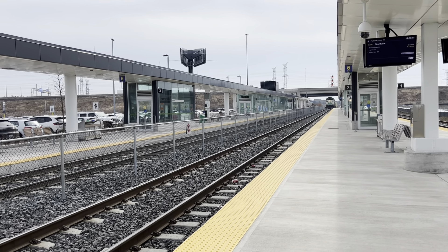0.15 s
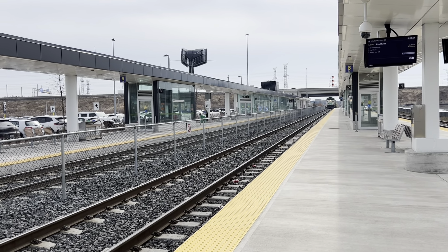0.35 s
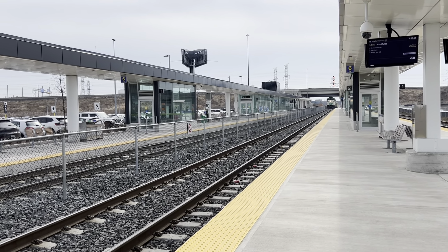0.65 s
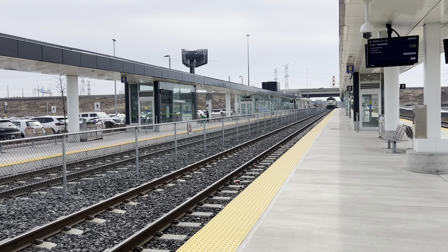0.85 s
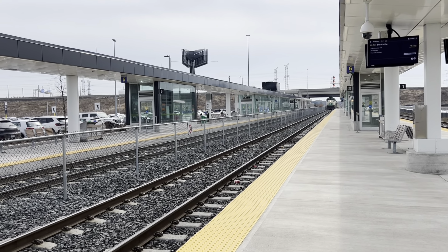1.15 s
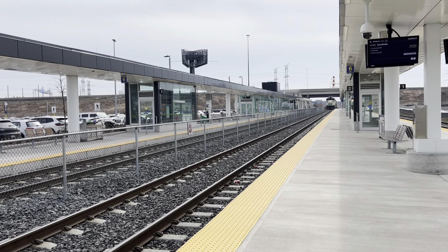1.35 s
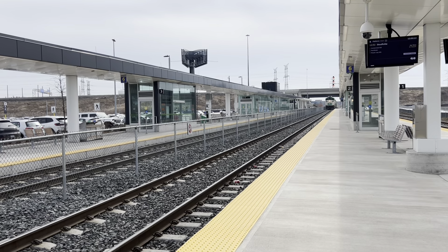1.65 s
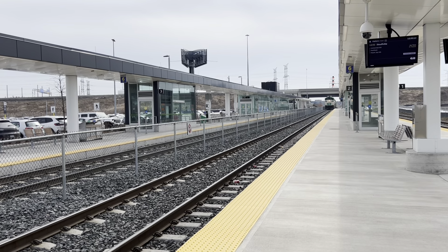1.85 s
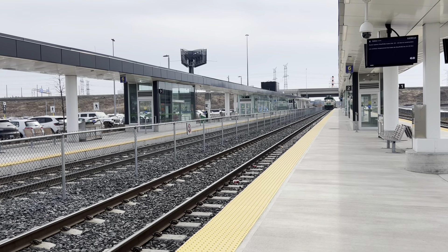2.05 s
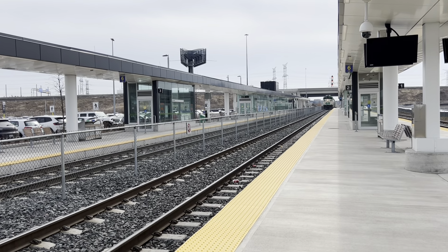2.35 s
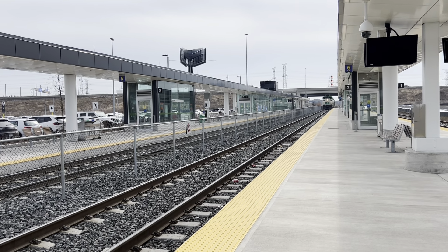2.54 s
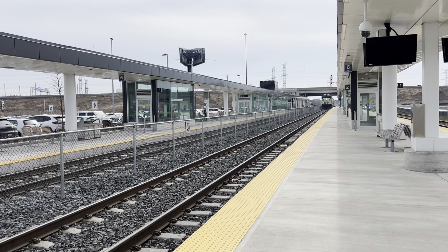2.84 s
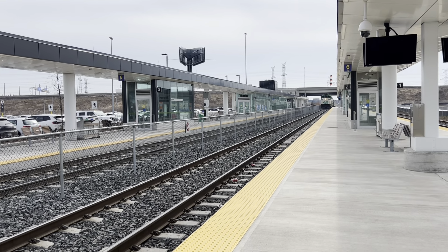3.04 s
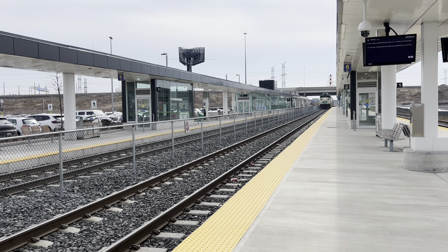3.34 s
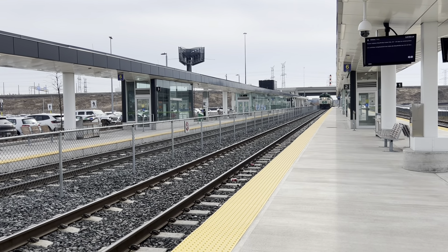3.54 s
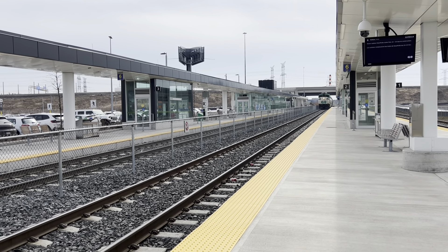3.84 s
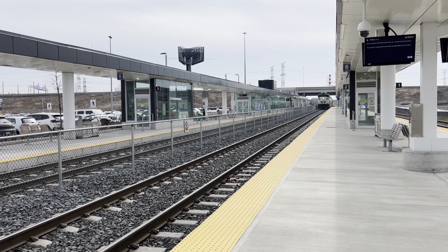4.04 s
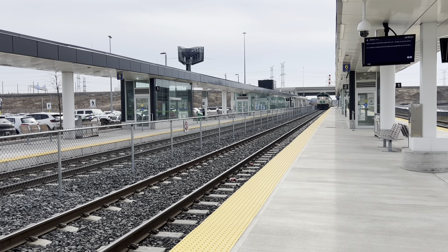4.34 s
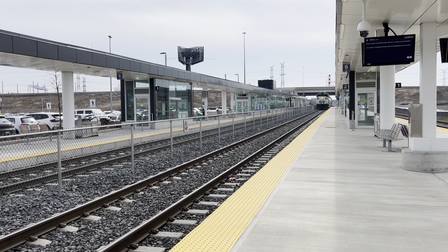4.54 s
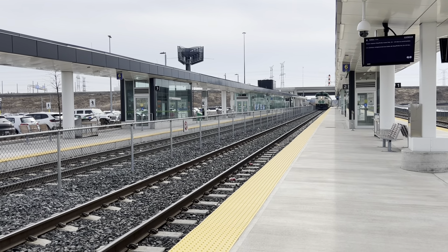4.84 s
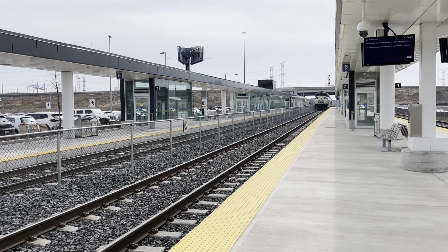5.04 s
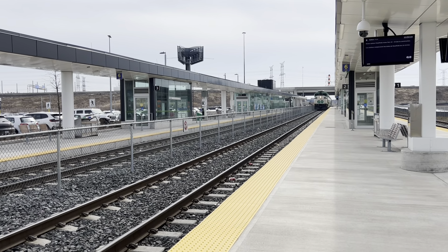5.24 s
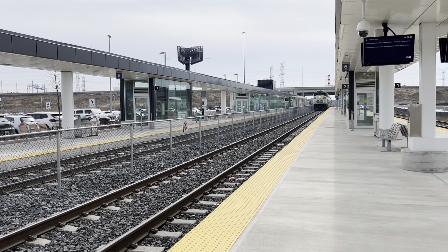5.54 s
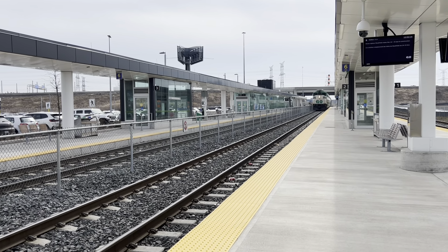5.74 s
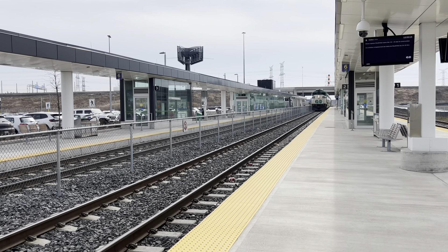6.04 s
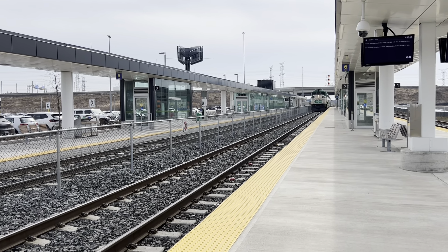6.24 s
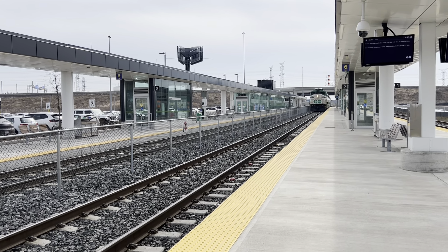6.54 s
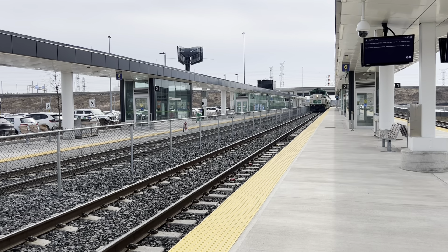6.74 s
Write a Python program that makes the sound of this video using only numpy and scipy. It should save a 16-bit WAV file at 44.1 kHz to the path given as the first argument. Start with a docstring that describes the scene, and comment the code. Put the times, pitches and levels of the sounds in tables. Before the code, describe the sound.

A steady train bell dominates, each stroke a hard metallic clang with a high, beating ring that swells again and overlaps the next. It starts distant and gets clearly louder halfway, with short reflections from roof and pillars. Low engine rumble, a humming fan and soft wheel noise rise slowly underneath, over a thin constant hiss. Heard in stereo from the platform, bell slightly left; the train never passes.

```python
"""A locomotive bell rings every two thirds of a second as a diesel train slows towards a roofed platform.
Each blow adds a clang, a crowd of overtones and a strong strike note that beats, swells again and lingers.
The bell is built from sine partials whose pitch sinks as the train brakes (Doppler shift).
Under it, shaped noise makes the exhaust throb, engine roar, wheels and hiss, all but a steady thin hiss
changing over time; wavering tones make the fan drone, and one faint ring sounds early on."""
import sys
import numpy as np
from scipy import signal
from scipy.fft import rfft, irfft, next_fast_len
from scipy.io import wavfile
from scipy.ndimage import uniform_filter1d

SR = 44100
rng = np.random.default_rng(int(sys.argv[2]) if len(sys.argv) > 2 else 0)


def unload_audio(sound):
    """Save the sound as a 16-bit wav file, at the path given as the first command line argument."""
    columns = np.transpose(np.atleast_2d(sound))
    # keep every value between -1 and 1, then stretch to whole-number steps
    steps = np.round(np.clip(columns, -1, 1) * 32767)
    wavfile.write(sys.argv[1], SR, steps.astype(np.int16))


N = 303849
TIME = np.arange(N) / SR  # seconds
EARS = np.array([[1], [-1]])  # left and right, with opposite signs

# One row for each blow of the clapper, the first already ringing out:
# (time [s], clang and lower partials [dB], 1.6 kHz partial [dB], treble partials [dB],
#  strike note's peak [dB], its second swell [dB], delay to the top of that swell [s],
#  its lingering ring [dB], bright partial [dB], bright partial's fade [dB/s])
BLOWS = [ (-0.364, -2.5, -16.5, -4.5, -34, -44.5, 0.09, -54.5, -51.5, 63),
         (0.296, -13.5, -16.5, -10.5, -32, -34, 0.25, -45, -72, 22),
         (0.957, -10, -11.5, -8, -27, -36.5, 0.22, -45.5, -57.5, 53),
         (1.617, -7, -9, 4, -20.5, -27, 0.3, -45.5, -56.5, 26),
         (2.273, 0, -3, -1, -31.5, -30, 0.32, -35, -44.5, 81),
         (2.937, -1, -9.5, -3, -13.5, -22, 0.27, -32.5, -53, 44.5),
         (3.6, 2, -2.5, 1, -14, -27, 0.28, -36, -54.5, 31.5),
         (4.264, 2, 2, 0, -16, -19.5, 0.26, -33.5, -50.5, 31.5),
         (4.929, 3.5, 2.5, 2, -15.5, -23, 0.27, -32, -48, 36),
         (5.593, 3.5, 1.5, -1.5, -14, -26.5, 0.33, -33, -51, 53.5),
         (6.260, 2.5, -1, 1.5, -17.5, -22.5, 0.29, -54.5, -53, 30), ]

# How near the train is: (time [s], nearness [0 far, 1 close])
NEARNESS = [(0, 0), (1.7, 0.22), (3.1, .2), (4.2, .6), (6.89, 0.95)]

NOTE_HZ = 1803  # reference pitch of the strike note, about the middle of its slow downward slide


def amp(db):
    """Turns decibels into a gain."""
    return 10 ** (np.asarray(db) / 20)


def unit(x):
    """Scales a signal to rms 1."""
    return x / np.sqrt(np.mean(abs(x) ** 2) + 1e-20)


def curve(rows, axis=1):
    """Reads one column of a time table at every sample."""
    rows = np.asarray(rows)
    return np.interp(TIME, rows[:, 0], rows[:, axis])


def at_hz(points, hz):
    """Reads a table of frequencies and values on a log-frequency axis."""
    f, value = np.transpose(points)
    return np.interp(np.log(hz + 1), np.log(f), value)


def rise(t, length_s):
    """A smooth start from 0 to 1."""
    return np.sin(np.pi / 2 * np.clip(t / length_s, 0, 1)) ** 2


def noise(spectrum):
    """Noise of rms 1 with the given spectrum."""
    size = next_fast_len(N, True)
    white = rfft(rng.standard_normal(size))
    shape = amp(at_hz(spectrum, np.fft.rfftfreq(size, 1 / SR)))
    return unit(irfft(white * shape, size)[:N])


def drift(rate_hz):
    """Smooth random movement of rms 1, mostly slower than the rate."""
    size = 4096
    hz = np.fft.rfftfreq(size, TIME[-1] / size)
    slow = irfft(rfft(rng.standard_normal(size)) / (1 + (hz / rate_hz) ** 4))
    return np.interp(TIME, np.linspace(0, TIME[-1], size), unit(slow))


def place(x, pan_db):
    """Places a sound in stereo; pan_db is the left level minus the right."""
    return x * amp(EARS * pan_db / 2)


def spread(spectrum, side_db, pan_db):
    """Wide noise: a part common to both ears plus a weaker part of opposite sign in each."""
    common = noise(spectrum)
    opposed = amp(side_db) * noise(spectrum)
    return place(common + EARS * opposed, pan_db)


def partial(phase, gain, flutter, rate_hz):
    """A tone with a share of scattered sound that makes it flutter."""
    scatter = 1 + flutter * (drift(rate_hz) + 1j * drift(rate_hz))
    smooth_gain = uniform_filter1d(gain, size=96)
    return np.sqrt(2) * smooth_gain * (scatter * np.exp(1j * phase)).real


def beating(t, beat_hz, twin, dip_s):
    """Loudness of a split mode: its twin weakens it most at dip_s and once in every beat."""
    return abs(1 - twin * np.exp(2j * np.pi * beat_hz * (t - dip_s)))


def bell_clock():
    """Bell time [s] whose rate sinks steadily, sliding pitches from slightly sharp to slightly flat."""
    start_hz, sag_hz_per_s = 1813.1, 2.28  # the strike note as heard at first, and how fast it sinks
    return np.cumsum(start_hz - sag_hz_per_s * TIME) / NOTE_HZ / SR


def station(x, early_s, early_db):
    """Dense early reflections from roof, pillars and track, then a tail that dies by band."""
    # How long the station rings: (frequency [Hz], time to fall by 60 dB [s])
    ring_times = [(300, 1.4), (1600, 0.43), (3000, 1.5), (6000, 0.07)]
    t = np.arange(SR) / SR
    # about 3000 random reflections a second, partly different at each ear
    taps = rng.standard_normal((2, SR)) * (rng.random((2, SR)) < 3000 / SR)
    taps = taps[0] + 0.6 * EARS * taps[1]
    taps = taps * (1 + amp(early_db) * np.exp(-t / early_s))
    hz, s, z = signal.stft(taps, SR, nperseg=256)
    decay = amp(-60 * s / at_hz(ring_times, hz)[:, None])
    tail = signal.istft(z * decay, SR, nperseg=256)[1]
    return signal.fftconvolve(x[None], tail / np.linalg.norm(tail[0]), axes=1)[:, :N]


def thin_hiss():
    """Steady thin hiss at the top of the spectrum, made of shaped noise."""
    # Relative spectrum of the hiss: (frequency [Hz], level [dB per Hz])
    hiss_spectrum = [(7000, -53.5), (10600, -38.5), (11050, -22.5), (11500, -38.5), (13600, -42.5),
                     (14100, -20.5), (14500, -14), (14900, -11.5), (15400, -4), (15800, -19)]
    return amp(-66.5) * spread(hiss_spectrum, side_db=-9.5, pan_db=-0.5)


def thin_tone(s=0.648, hz=1991, db=-56):
    """A faint, brief ring somewhere in the station: one sine with a soft start and a quick fade."""
    t = np.maximum(TIME - s, 0)
    envelope = (1 - np.exp(-t / 0.01)) * np.exp(-(t / 0.14) ** 2)
    ring = amp(db) * np.sin(2 * np.pi * hz * t) * envelope
    return ring + station(ring, early_s=0.03, early_db=-3.0)


def exhaust():
    """The exhaust's deep throb: low-frequency noise that swells and eases."""
    # Relative spectrum of the exhaust: (frequency [Hz], level [dB per Hz])
    exhaust_spectrum = [(15, -42.5), (30, -29), (40, -10.5), (47, 6), (52, 13.5), (60, 3.5), (72, 5),
                        (90, -11), (130, -28.5), (250, -82)]
    # How loud the exhaust's throb is over time: (time [s], relative level [dB])
    throb = [(0, -34.5), (0.3, -35.5), (1.7, -36.5), (2.35, -34), (3.05, -39.5), (3.6, -34), (4.1, -33.5),
             (4.7, -32), (5.05, -37), (5.55, -29.5), (5.8, -33.5), (6.15, -30), (6.89, -32)]
    return amp(curve(throb) - 0.76) * spread(exhaust_spectrum, side_db=-22.5, pan_db=-0.9)


def engine():
    """The engine's roar: unsteady noise that grows as the train nears."""
    # Relative spectrum of the engine: (frequency [Hz], level [dB per Hz])
    engine_spectrum = [(60, -24.5), (100, -2), (116, -0.5), (132, -1), (165, -6), (215, -2), (270, -7.5),
                       (330, -8), (450, -12), (800, -40.5), (2000, -72)]
    far_db, growth_db = -49.5, 6.5  # level far off, and the gain once close
    level = amp(far_db + growth_db * curve(NEARNESS))
    return level * spread(engine_spectrum, side_db=-15.0, pan_db=-2.0) * amp(1.1 * drift(8.1))


def wheels():
    """The wheels' rolling noise, wide and uneven, growing as the train nears."""
    # Relative spectrum of the wheels: (frequency [Hz], level [dB per Hz])
    wheel_spectrum = [(150, -21.5), (380, -9), (530, 0), (700, 0), (1050, -2), (1350, -4), (1850, -4),
                      (2150, -14.5), (3000, -19.5), (4000, -31.5), (5500, -41.5), (8000, -72)]
    far_db, growth_db = -53, 9  # level far off, and the gain once close
    level = amp(far_db + growth_db * curve(NEARNESS))
    return level * spread(wheel_spectrum, side_db=-1.5, pan_db=-1.0) * amp(1.3 * drift(24))


def near_hiss():
    """Wheel and brake hiss that grows steadily, as air absorbs the treble of a far train."""
    # Relative spectrum of the hiss: (frequency [Hz], level [dB per Hz])
    near_spectrum = [(600, -24), (1000, -6), (1130, 7.5), (1330, 12), (2000, -7.5), (3000, -11.5),
                     (4500, -15.5), (6000, -27.5), (8000, -41), (12000, -44.5)]
    end_db, growth_db_per_s = -44.5, 5.3
    level = amp(end_db + growth_db_per_s * (TIME - TIME[-1]))
    return level * spread(near_spectrum, side_db=-7.0, pan_db=3)


def fan():
    """The cooling fan's drone: five wavering harmonics, sinking as the fan slows and the train nears."""
    far_db, growth_db = -57, 14.5  # level far off, and the gain once close
    far_hz, sag_hz, waver_hz = 299.2, 34.95, 6
    near = curve(NEARNESS)
    phase = 2 * np.pi * np.cumsum(far_hz - sag_hz * near + waver_hz * drift(3)) / SR
    drone = np.zeros(N)
    for harmonic, db in enumerate([0, -7.5, -23, -17, -5.5], 1):
        scatter = 0.6 + 0.79 * (drift(13) + 1j * drift(26))
        drone += amp(db) * (scatter * np.exp(1j * harmonic * phase)).real
    return place(amp(far_db + growth_db * near) * drone, -1.2)


def clang(count=110, t60=0.36):
    """The clapper sets off a crowd of short-lived modes, over a burst smeared by the long platform."""
    # Relative spectrum of the clang: (frequency [Hz], level [dB per Hz])
    clang_spectrum = [(300, -48), (800, -7), (1150, -17), (1400, -7), (1600, -2), (1880, 1.5),
                      (2080, -16.5), (2400, -15), (2800, -23), (3500, -23.5), (3900, -34.5), (5200, -42.5),
                      (6500, -60.5), (9000, -74)]
    hz = np.geomspace(1150, 6200, count) * rng.uniform(0.99, 1.01, count)
    weight = amp(at_hz(clang_spectrum, hz)) * np.sqrt(hz)  # higher modes stand for wider bands
    weight = weight / np.linalg.norm(weight)
    t = np.arange(SR // 2) / SR
    modes = np.exp(2j * np.pi * hz[:, None] * t) * amp(-60 * t / t60) * rise(t, 0.007)
    envelope, crowd = np.zeros(N), np.zeros((2, N + SR))
    for s, db, *_ in BLOWS[1:]:
        since = np.maximum(TIME - s + 0.004, 0)  # the burst starts slightly early
        fade = np.exp(-since / 0.015) + amp(-14.5) * np.exp(-since / 0.25)
        envelope += amp(db) * rise(since, 0.018) * fade
        # each blow stirs the modes in a new mix, slightly different at each ear
        mix = rng.standard_normal((2, count)) + 1j * rng.standard_normal((2, count))
        common, opposed = weight * mix
        start = round(s * SR)
        crowd[:, start:start + len(t)] += amp(db) * ((common + 0.4 * EARS * opposed) @ modes).real
    burst = amp(-26) * envelope * spread(clang_spectrum, side_db=-9, pan_db=-0.5) * amp(0.5 * drift(60))
    return burst + place(amp(-32) * crowd[:, :N], -1.5)


def overtones():
    """Each blow rings the other partials in a new mix; the bell is not quite round, so strong ones beat."""
    # Reference pitches of the two split partials: [Hz]
    pair_hz = [1609, 2966]
    # The same two partials:
    # (relative level [dB], time to fall by 60 dB [s], typical beat rate [Hz], twin's share [0 to 1])
    pairs = [(-35, 2.33, 4.2, 0.7), (-42, 1.35, 6.7, 0.5)]
    # Reference pitches of the weaker partials: [Hz]
    mode_hz = [1132, 1330, 1418, 1448, 1495, 1548, 1869, 1895, 1932, 2226, 2260, 2427, 2496, 2616, 3315,
               3412, 3603, 4775, 5470, 5920, 6098]
    # The same partials, before each blow's level and luck:
    # (relative level [dB], time to fall by 60 dB [s])
    mode_rings = [(-56, 1.9), (-48.5, 3.6), (-42, 1.3), (-44, 1.1), (-36, 0.4), (-37, 0.19), (-41.5, 0.48),
                  (-51, .7), (-55, 1.0), (-56, .6), (-54, 1.2), (-54, .6), (-50, 0.3), (-52, 0.55),
                  (-52, .45), (-50.5, 0.38), (-50.5, 0.3), (-54, 0.28), (-67, .25), (-68, 0.35), (-64, 0.4)]
    clock = bell_clock()
    low, high = np.zeros(N), np.zeros(N)  # partials below and above 2 kHz
    chances = rng.random((len(BLOWS), 2, len(mode_rings)))
    for (s, clang_db, low_pair_db, treble_db, *_), (phases, lucks) in zip(BLOWS, chances):
        start = round(s * SR)
        span = slice(max(start, 0), start + SR)
        t = clock[span] - clock[span][0] + max(-s, 0)
        window = rise(t, 0.0079) * rise(t[-1] - t, 0.044)
        for hz, (db, t60), phase, luck in zip(mode_hz, mode_rings, phases, lucks):
            band, blow_db = (low, clang_db) if hz < 2000 else (high, treble_db)
            level = amp(blow_db + db + 3.3 * (luck - 2.5) - 60 * t / t60)
            band[span] += window * level * np.sin(2 * np.pi * (hz * t + phase))
        pair_levels = (low_pair_db, treble_db)
        for hz, (db, t60, beat, twin), blow_db, phase, luck in zip(pair_hz, pairs, pair_levels, phases, lucks):
            band = low if hz < 2000 else high
            twin_hz = hz - beat * (1 + 0.67 * (luck - 0.5))
            pair = np.sin(2 * np.pi * (hz * t + phase)) + twin * np.sin(2 * np.pi * (twin_hz * t + phase))
            band[span] += window * amp(blow_db + db - 60 * t / t60) * pair
    # moving air makes the partials waver
    low = low * amp(2.5 * drift(18))
    high = high * amp(3.2 * drift(14))
    low_sound = amp(-2) * low + amp(1) * station(low, early_s=0.0067, early_db=10.5)
    high_sound = high + amp(-7) * station(high, early_s=0.017, early_db=5)
    return place(low_sound, -7) + place(high_sound, -0.89)


def strike_note():
    """The main partial peaks, swells and lingers; a hum rings below it and a bright partial beats above."""
    # The hum tone, ringing on from blow to blow and stronger once the train is nearer:
    # (time [s], level [dB])
    hum_levels = [(0, -57.5), (0.35, -51.5), (1, -56), (2.3, -48.5), (2.65, -59.5), (3.0, -41),
                  (3.6, -39.5), (4.45, -40), (4.65, -44), (5.3, -42), (6.35, -41.5), (6.89, -49)]
    hum_hz, bright_hz = 812, 4296  # reference pitches, sliding along with the strike note
    direct_share, direct_s = 0.35, 0.003  # the direct path arrives first
    attack_s, peak_s = 0.035, 0.12  # reflections then build the note up
    peak_fade, swell_fade = 84.5, 86  # dB/s
    swell_rise_s = 0.16

    blows = np.array(BLOWS)
    latest = blows[np.searchsorted(blows[:, 0], TIME) - 1]
    s, _, _, _, peak_db, swell_db, swell_s, linger_db, bright_db, bright_fade = latest.T
    t = TIME - s  # time since the latest blow
    angle = 2 * np.pi * bell_clock()
    # each blow adds a new ring, out of step with the old one
    turns = rng.uniform(-1.5, 1.8, len(BLOWS))  # radians
    slip = sum(turn * rise(TIME - blow[0], 0.0027) for blow, turn in zip(BLOWS, turns))

    attack = direct_share * rise(t, direct_s) + (1 - direct_share) * rise(t, attack_s)
    peak = amp(peak_db) * attack * np.maximum(np.exp(-(t / peak_s) ** 2.6), amp(-peak_fade * t))
    swell = amp(swell_db - swell_fade * np.maximum(t - swell_s, 0))
    swell = swell * rise(t - swell_s + swell_rise_s, swell_rise_s)
    linger = amp(linger_db) * beating(t, beat_hz=2.63, twin=0.31, dip_s=0.156)
    gain = np.sqrt(peak ** 2 + swell ** 2 + linger ** 2)
    note = partial(NOTE_HZ * angle + slip, gain, flutter=0.15, rate_hz=25)
    note_sound = note + amp(-35.5) * station(note, early_s=0.022, early_db=-4)

    hum = partial(hum_hz * angle + slip, amp(curve(hum_levels)), flutter=0.17, rate_hz=17)

    ring = amp(bright_db - bright_fade * t) * rise(t, 0.008)
    ring = ring * beating(t, beat_hz=4.26, twin=0.76, dip_s=0.23)
    # reflections reach the ears unequally: the bright partial is out of phase and wanders side to side
    bright = partial(bright_hz * angle + slip + 0.33 * EARS, ring, flutter=0.35, rate_hz=14)
    bright = bright * amp(EARS * 3.0 * drift(4.8))
    return place(note_sound, -6.5) + place(hum, -7.0) + bright


def scene():
    """Adds the bell and the train together in the open station."""
    train = exhaust() + engine() + wheels() + near_hiss() + fan()
    bell = clang() + overtones() + strike_note()
    return thin_hiss() + thin_tone() + train + bell


def record(dry):
    """Eases both ends and removes the sound above about 15.85 kHz."""
    eased = dry * rise(TIME, 0.004) * rise(TIME[-1] - TIME, 0.004)
    low_pass = signal.firwin(801, 15850, window=("kaiser", 9), fs=SR)
    return signal.oaconvolve(eased, low_pass[None], "same")


dry = scene()
out = record(dry)
unload_audio(out)
```